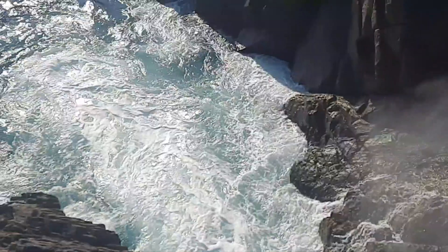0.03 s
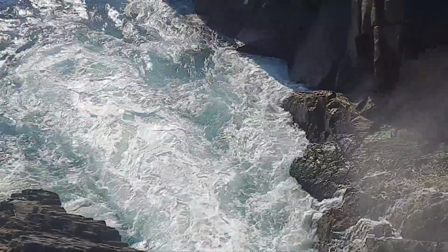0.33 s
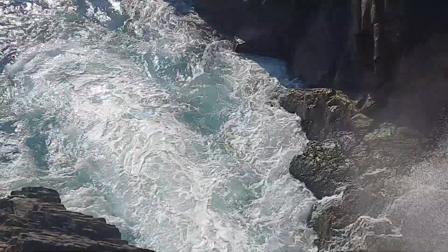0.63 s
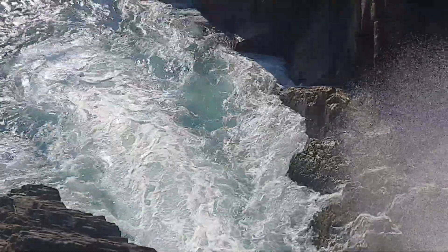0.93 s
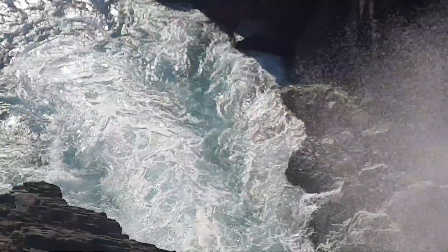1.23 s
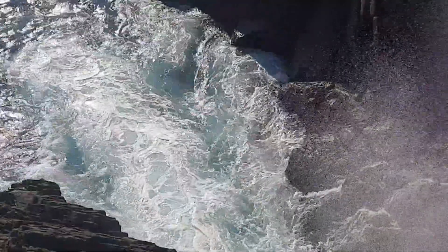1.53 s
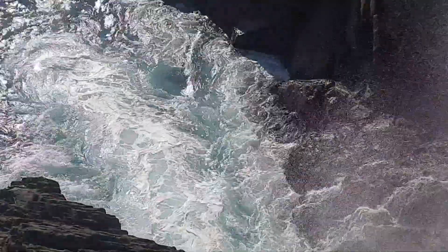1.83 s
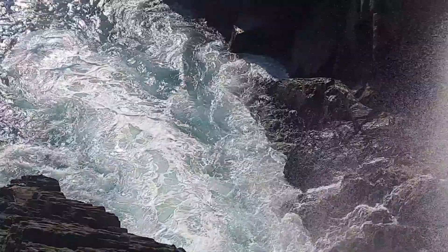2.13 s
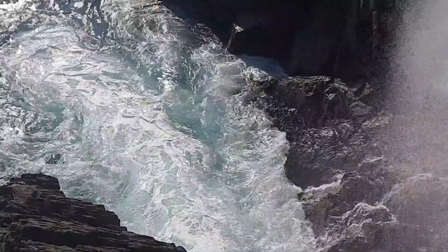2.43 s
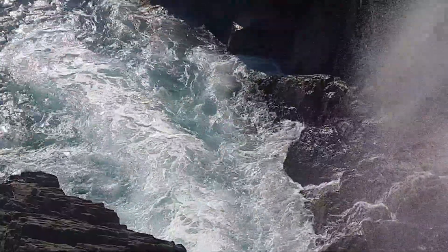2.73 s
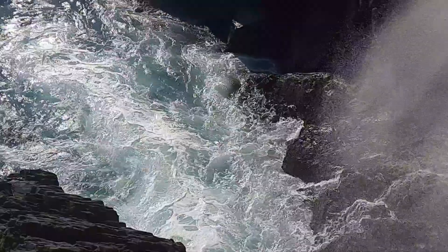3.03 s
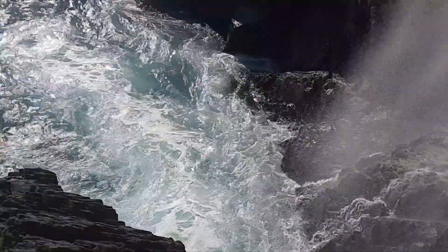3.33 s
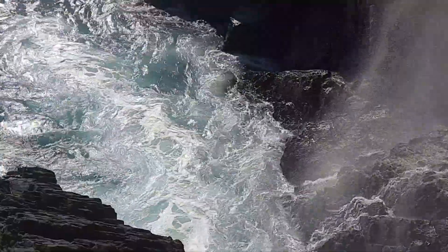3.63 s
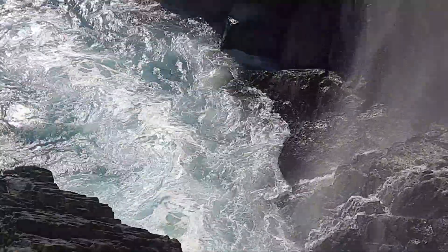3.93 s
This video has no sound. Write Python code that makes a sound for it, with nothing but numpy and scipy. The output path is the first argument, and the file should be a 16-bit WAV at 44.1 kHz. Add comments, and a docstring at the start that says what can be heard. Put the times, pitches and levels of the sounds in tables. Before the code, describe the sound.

A sea swell roars with hollow booms in a rocky inlet, heard close in stereo. Water breaks on the rock over constant churning foam, then the roar fades and a rising hiss of falling spray takes over to the right.

```python
"""Swell in a rocky cleft

Close to a rocky inlet, on a stereo pair. A swell surges into a cleft: air and water roar and boom in the
hollow, masses of water break on the rock, then the surge dies away. White water washes on throughout. On the
right the cleft throws up a plume of spray, which hisses ever louder as its drops rain back on the rocks."""
import sys
import numpy as np
from scipy.fft import rfft, irfft
from scipy.io import wavfile
from scipy.ndimage import uniform_filter1d

SR = 44100
rng = np.random.default_rng(int(sys.argv[2]) if len(sys.argv) > 2 else 0)


def dump(signal):
    """Clip the signal to [-1, 1] and save it as 16-bit WAV at the path in sys.argv[1]."""
    limited = np.clip(np.atleast_2d(signal).T, -1, 1)
    pcm = np.round(limited * 32767).astype(np.int16)
    wavfile.write(sys.argv[1], SR, pcm)


N = 176400
HZ = np.maximum(np.arange(N // 2 + 1) * SR / N, 1)


def cleft():
    """The surge roars through the ringing throat of the cleft and sets the hollow behind it booming."""
    # roar in the throat and boom of the hollow: t/s, level/dB
    roar_level = [(0, -19.5), (0.34, -18.0), (0.44, -23), (0.8, -22.5), (0.92, -19), (1.12, -18),
                  (1.3, -19), (1.44, -23), (1.64, -19.5), (1.84, -21), (1.95, -25.5), (2.18, -22.5),
                  (2.34, -20.0), (2.58, -24), (2.76, -30), (2.96, -35.5), (3.35, -35), (3.75, -39.5),
                  (4.0, -37.5)]
    boom_level = [(0, -22.5), (0.25, -22.5), (0.62, -28.5), (0.95, -23), (1.25, -17.5), (1.42, -24),
                  (1.76, -26), (1.94, -18), (2.17, -22), (2.45, -18.5), (2.68, -28.5), (2.92, -39.5),
                  (3.53, -38.5), (3.8, -51), (4.0, -48)]
    # their spectra: f/Hz, level/dB
    roar_colour = [(45, -40), (78, -9.5), (105, -2.5), (150, 0), (195, -2.5), (218, -5), (240, -2.5),
                   (268, -5.5), (300, -1.5), (365, -6.5), (425, -15), (530, -23.5), (800, -25), (1200, -33),
                   (2200, -48.5)]
    boom_colour = [(10, -36), (23, -28), (35, -14), (48, -5.5), (58, -2), (67, 3), (76, 0), (92, -3),
                   (125, -11.5), (250, -46.5)]
    ring_hz, width_hz, lift_db = 299.7, 26.4, 4
    throat = from_db(lift_db / (1 + (2 * (HZ - ring_hz) / width_hz) ** 2))
    flow = irfft(rfft(turbulence(roar_colour)) * throat, N)
    roar = from_db(in_time(roar_level)[0] - 1) * steadied(flow)
    boom = from_db(in_time(boom_level)[0] - 2) * steadied(turbulence(boom_colour))
    return roar + boom


def spray():
    """Drops rain on the rocks in a dense hiss to the right, with fine mist above it."""
    # falling spray: t/s, hiss level/dB, mist level/dB
    levels = [(0, -51, -58), (0.35, -46.5, -53), (0.56, -43.5, -55), (0.76, -40.5, -47.5),
              (1.08, -40.5, -54), (1.3, -40, -47.5), (1.95, -35.5, -46.5), (2.4, -36, -46.5),
              (2.78, -34.5, -40.5), (3.2, -35, -43.5), (3.66, -33.5, -43.5), (3.82, -32, -41.5),
              (4.0, -28, -37.5)]
    # spectra of hiss and mist: f/Hz, level/dB
    hiss_colour = [(400, -22), (1000, -17.5), (2000, -7.5), (2900, -6), (4500, -1), (6000, 0), (7500, -1),
                   (10000, -8), (16000, -23)]
    mist_colour = [(5000, -16), (8000, -1), (11000, -4), (14000, 1.5), (16000, -4)]
    hiss_db, mist_db = in_time(levels)
    hiss = churn(shower(hiss_colour), patchy_db=0.5, rate_hz=17)
    mist = churn(shower(mist_colour), patchy_db=0.3, rate_hz=12)
    return from_db(hiss_db + 1) * panned(-3) * hiss + from_db(mist_db + 9.5) * mist


def shower(colour, drops_per_s=9000, spread_db=3, drop_share=0.56):
    """Countless tiny impacts, most small and a few large, blended with smooth noise."""
    sizes = from_db(spread_db * np.minimum(rng.exponential(1, (2, N)), 5))
    signs = rng.choice([-1, 1], (2, N))
    hits = rng.random((2, N)) < drops_per_s / SR
    drops = coloured(rfft(sizes * signs * hits), colour)
    return np.sqrt(drop_share) * drops + np.sqrt(1 - drop_share) * turbulence(colour)


def white_water():
    """Foam churns across the inlet."""
    # wash of the foam: t/s, level/dB
    level = [(0, -41), (0.35, -42), (0.56, -40), (0.8, -39.5), (1.18, -40.5), (1.4, -41.5), (1.72, -39.5),
             (2.0, -42.5), (2.25, -41.0), (2.6, -42), (3.2, -44.5), (3.65, -44.5), (3.9, -43), (4.0, -42.5)]
    # its spectrum: f/Hz, level/dB
    colour = [(60, -17), (300, 6), (520, -1), (780, 1), (1200, -1.5), (1850, -1.5), (2150, -5.5),
              (2900, -6), (4500, -1.5), (7000, -9.5), (11000, -15), (16000, -20)]
    foam = churn(turbulence(colour, lead_share=0.76), patchy_db=1.2, rate_hz=14)
    return from_db(in_time(level)[0] + 6.5) * foam


def breakers():
    """Each mass of water that breaks on the rock gives a rounded rush."""
    # breaking water: peak t/s, level/dB, half-length/s
    breaks = [(0.107, -47, 0.11), (.62, -41.5, .12), (1.123, -41, 0.16), (1.703, -42, 0.19),
              (2.286, -37, 0.19)]
    # spectrum of the rush: f/Hz, level/dB
    colour = [(250, -18), (500, 4), (800, 1.5), (1200, -5), (2200, -17.5), (5000, -20)]
    t = np.arange(N) / SR
    swell = sum(from_db(db) * np.exp(-0.5 * ((t - peak) / half) ** 2) for peak, db, half in breaks)
    return swell * churn(turbulence(colour), patchy_db=0.3, rate_hz=14)


def turbulence(colour, lead_share=1):
    """Rushing noise at the pair, alike on both sides in the bass and diffuse in the treble."""
    # likeness of the two sides: f/Hz, correlation
    likeness = [(100, 0.99), (240, 0.98), (380, 0.99), (520, 0.75), (750, 0.72), (1000, 0.68), (1400, 0.31),
                (1900, 0.58), (2400, 0.47), (3200, 0), (16000, 0.087)]
    # lead of the left side, before scaling by lead_share: f/Hz, phase/rad
    lead = [(140, 0), (300, 0.24), (400, 0.17), (520, 1.3), (720, 0.57), (1000, 1.0), (1400, 2.7),
            (1900, 3), (2150, 2.45), (2450, -1), (2900, -1)]
    left, other = rfft(rng.standard_normal((2, N)))
    alike = in_pitch(likeness)[0]
    lag = np.exp(-1j * lead_share * in_pitch(lead)[0])
    right = (alike * left + np.sqrt(1 - alike ** 2) * other) * lag
    return coloured(np.array([left, right]), colour)


def churn(x, patchy_db, rate_hz):
    """Each octave swells and sinks by itself as patches of water break."""
    spectrum, out = rfft(x), 0
    octave = np.clip(np.log2(HZ / 125), 0, 7)
    for k in range(8):
        band = irfft(spectrum * np.maximum(1 - abs(octave - k), 0), N)
        drift = irfft(rfft(rng.standard_normal(N)) / (1 + (HZ / rate_hz) ** 2), N)
        out = out + band * from_db(patchy_db * rms_one(drift))
    return rms_one(out)


def steadied(x, window_s=0.14, strength=0.97):
    """A sustained flow: slow chance swings of the level are mostly evened out."""
    power = uniform_filter1d(np.mean(x ** 2, axis=0), int(window_s * SR))
    return rms_one(x / (power + 1e-12) ** (strength / 2))


def coloured(spectrum, colour):
    """Sound at unit rms from a spectrum shaped by a colour table."""
    return rms_one(irfft(spectrum * from_db(in_pitch(colour)[0]), N))


def in_time(rows):
    """The columns of a curve at every sample."""
    times, *columns = np.transpose(rows)
    return [np.interp(np.arange(N) / SR, times, c) for c in columns]


def in_pitch(rows):
    """The columns of a spectrum at every frequency."""
    hz, *columns = np.transpose(rows)
    return [np.interp(np.log(HZ), np.log(hz), c) for c in columns]


def panned(db):
    """Constant-power gains for a left-minus-right level difference."""
    gains = from_db(np.array([[1], [-1]]) * db / 2)
    return gains / np.sqrt(np.mean(gains ** 2, axis=0))


def from_db(db):
    """Decibels to gain."""
    return 10 ** (np.asarray(db) / 20)


def rms_one(x):
    """Scale to unit rms."""
    return x / np.sqrt(np.mean(x ** 2) + 1e-20)


def scene():
    """The inlet as heard from the rocks."""
    return cleft() + white_water() + spray() + breakers()


def record(dry):
    """The microphones colour each side, with a deep notch in the treble; the top is cut."""
    # the stereo pair: f/Hz, response/dB, left minus right/dB
    microphones = [(50, 1.5, 1), (340, 1, 2.5), (480, 1, 5.5), (646, 0.5, 2), (970, 0, 4), (1550, -1, 5.5),
                   (2110, -1.5, 4), (2450, 0.4, 5.5), (2740, -2.5, 3.5), (3200, -2.5, 2), (4270, -3, -.7),
                   (5100, -1, -6), (6200, -.5, -7.5), (7250, -5.5, 2), (8120, -15, 1), (9340, -26, -2),
                   (10300, -16, 2), (12060, -7, 1.5), (13700, -7, 0), (15700, -6.5, 2)]
    response_db, balance_db = in_pitch(microphones)
    cutoff_hz = 15720
    low_pass = 1 / np.sqrt(1 + (HZ / cutoff_hz) ** 900)
    return irfft(rfft(dry) * from_db(response_db) * panned(balance_db) * low_pass, N)


dry = scene()
out = record(dry)
dump(out)
```